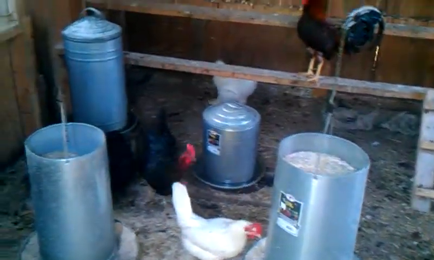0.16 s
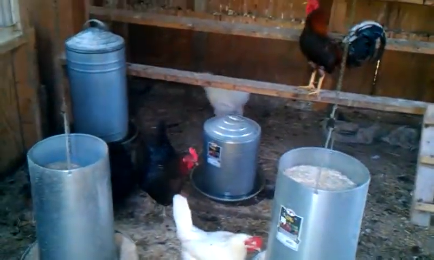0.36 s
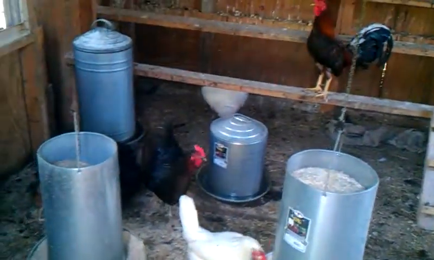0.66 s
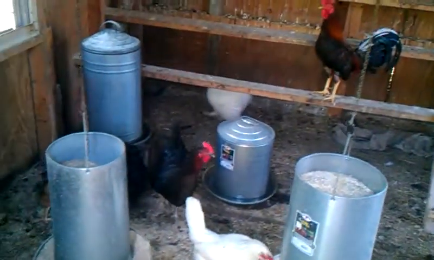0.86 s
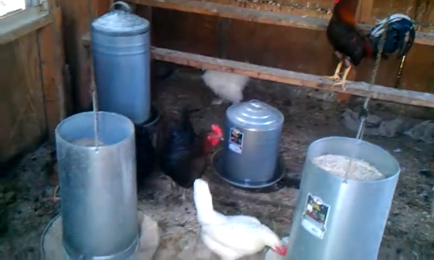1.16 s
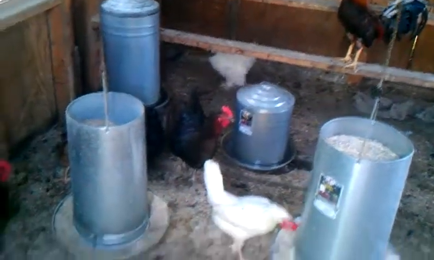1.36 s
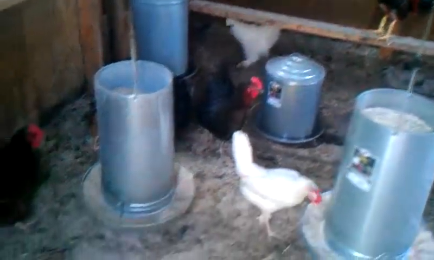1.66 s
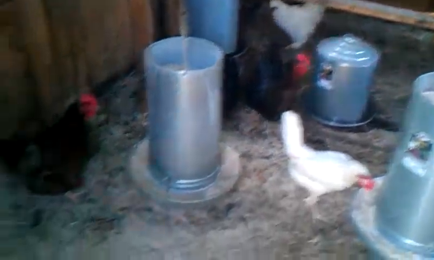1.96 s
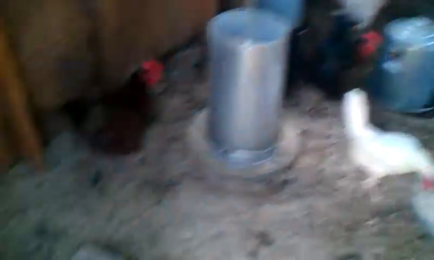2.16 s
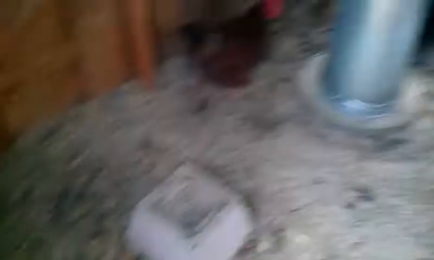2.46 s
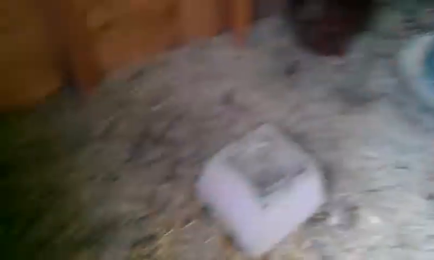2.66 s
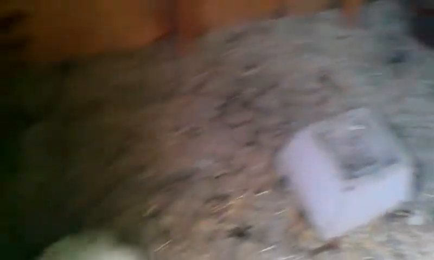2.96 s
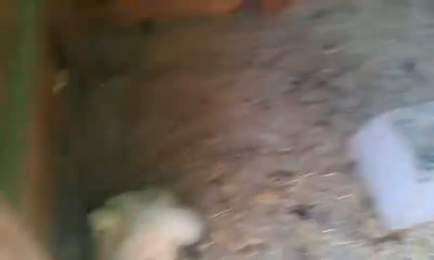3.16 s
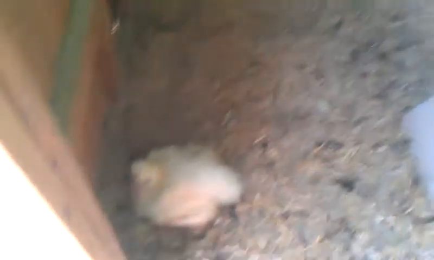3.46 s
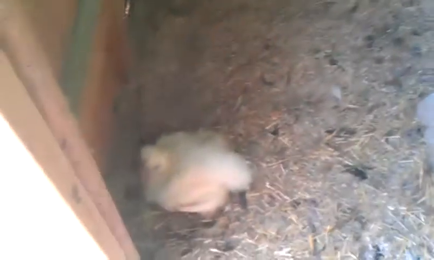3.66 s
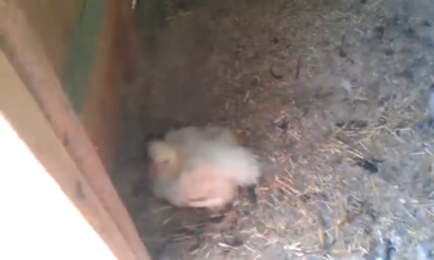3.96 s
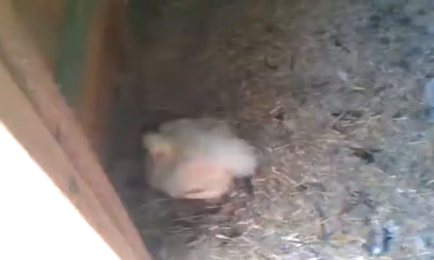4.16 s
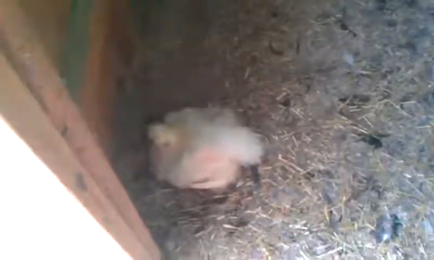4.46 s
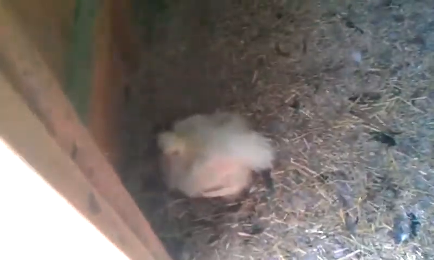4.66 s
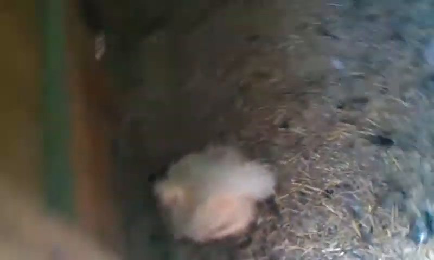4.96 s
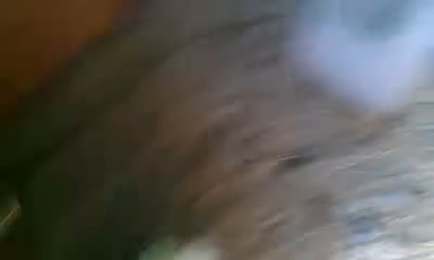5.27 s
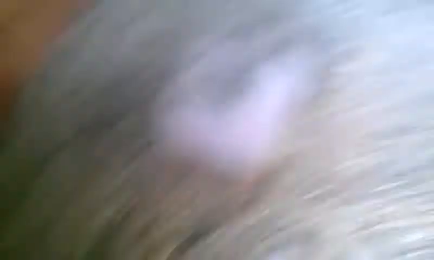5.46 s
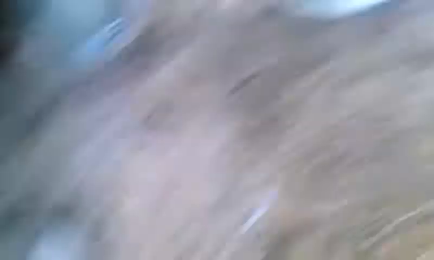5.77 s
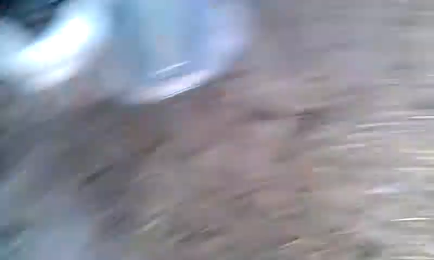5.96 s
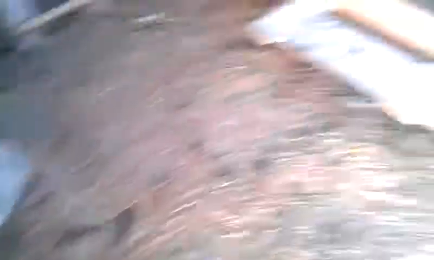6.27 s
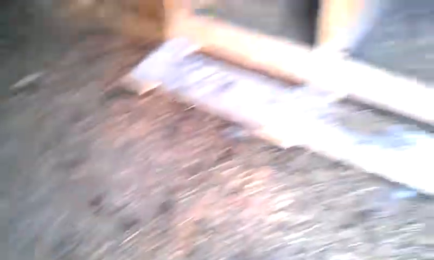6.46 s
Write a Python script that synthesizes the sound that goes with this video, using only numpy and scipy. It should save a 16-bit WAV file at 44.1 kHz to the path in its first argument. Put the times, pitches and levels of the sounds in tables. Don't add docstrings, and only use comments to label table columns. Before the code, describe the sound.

Faint far clucks give way to a steady middle-distance clucking hen, then handling bumps and a sharp close squawk, all over thin high hiss.

```python
import sys
import numpy as np
from scipy import signal
from scipy.io import wavfile
from scipy.ndimage import uniform_filter1d

SR = 44100
rng = np.random.default_rng(int(sys.argv[2]) if len(sys.argv) > 2 else 0)


def dump_mix(stems):
    frames = np.atleast_2d(stems).T
    limited = np.clip(frames, -1, 1)
    pcm = np.round(limited * 32767).astype(np.int16)
    wavfile.write(sys.argv[1], SR, pcm)


def invert_db(x):
    u = np.asarray(x, float) / 20
    return 10 ** u


N = 291501

NEAR_ROUGH = (0.51, 0.055)


def evened(x):
    return x / np.sqrt(np.mean(x ** 2) + 1e-20)


def read(points, hz):
    f, value = np.transpose(points)
    return np.interp(np.log(hz + 1), np.log(f + 1), value)


def bell(t, centre_s, half_s):
    return np.exp(-((t - centre_s) / half_s) ** 2)


def swelling(t, rest_db, swells):
    power = invert_db(rest_db) ** 2
    power = power + sum(invert_db(db) ** 2 * bell(t, s, half) for s, half, db in swells)
    return 10 * np.log10(power)


def air(layers, patchy_db):
    frames, hz = N // 128 + 6, np.fft.rfftfreq(512, 1 / SR)
    t = np.arange(frames) * 128 / SR
    power = np.zeros((len(hz), frames))
    for shape, s, level_db in layers:
        gain = invert_db(read(shape, hz)) ** 2
        power += np.outer(gain / gain.sum(), invert_db(np.interp(t, s, level_db)) ** 2)
    a, b, patches = rng.standard_normal((frames, len(hz), 3)).T
    noise = a + 1j * b
    patches = evened(uniform_filter1d(uniform_filter1d(patches, 8, 0), 24, 1))
    flicker = evened(uniform_filter1d(rng.standard_normal(frames), 10))
    unit = signal.istft(noise, nperseg=512, noverlap=384)[1].std() / np.sqrt(len(hz))
    z = noise * np.sqrt(power) * invert_db(patchy_db * patches + 0.4 * flicker)
    return signal.istft(z, nperseg=512, noverlap=384)[1][:N] / unit


def door_hiss():
    # (time [s], bright level [dB])
    facing = [(0, -54), (.3, -53), (1.29, -50.5), (1.73, -52.5), (1.88, -57.5), (3.11, -52), (3.74, -53),
              (4.2, -49.5), (4.4, -42), (4.69, -40), (5.1, -35), (5.41, -44.5), (5.62, -47.5),
              (6.15, -52.5), (6.61, -47)]
    # (frequency [Hz], density [dB per Hz])
    port = [(5000, -45), (6000, -27), (6670, -16), (6970, -8), (7280, -3), (8210, 1), (10300, -12),
            (11500, -16), (12500, -22), (15800, -27)]
    # (frequency [Hz], density [dB per Hz])
    upper = [(6000, -34), (6840, -20), (7420, -9), (8090, -5), (9300, -2), (10000, 0), (10900, -7),
             (12700, -12), (14000, -19), (15800, -19)]
    # (frequency [Hz], density [dB per Hz])
    airy = [(10000, -25), (12000, 0), (14000, -2), (15800, 0)]
    # (centre [s], half length [s], level [dB])
    swing = [
        (5.45, .16, -46),
    ]
    s = np.arange(0, N, 128) / SR
    door_db = np.interp(s, *np.transpose(facing))
    facing_db = np.minimum(door_db, -42.5)
    steady_db = -42 + 0.21 * (facing_db - door_db[0])
    airy_db = swelling(s, facing_db - 9.5, swing)
    return air([(port, s, steady_db), (upper, s, door_db), (airy, s, airy_db)], patchy_db=0.4)


def yard():
    # (centre [s], half length [s], level [dB])
    murmur_swells = [
        (.25, 0.37, -65.5),
        (1.579, 0.26, -64),
        (4.4, 0.22, -66),
        (5.2, 0.18, -61.5),
    ]
    # (centre [s], half length [s], level [dB])
    scratching = [
        (5.45, .1, -66),
        (5.85, 0.24, -65),
    ]
    # (centre [s], half length [s], change [dB])
    lull = (1.15, 0.57, -4)
    # (frequency [Hz], density [dB per Hz])
    murmur = [(150, -32), (240, -7), (300, -3.5), (550, -8), (620, -8.5), (900, -14.5), (1500, -41),
              (2500, -71)]
    # (frequency [Hz], density [dB per Hz])
    rumble = [(20, 4), (60, 6.5), (240, -1), (900, -0.5), (1540, -0.5), (2600, -5), (3500, -45),
              (5000, -51)]
    # (frequency [Hz], density [dB per Hz])
    rustle = [(2000, 1.5), (2800, 4.5), (3500, 8.5), (4250, 4.5), (5200, 11.5), (5900, 6.5), (6600, -7)]
    s = np.arange(0, N, 128) / SR
    lull_s, half_s, lull_db = lull
    murmur_db = swelling(s, -66.5, murmur_swells)
    rumble_db = -63 + lull_db * bell(s, lull_s, half_s)
    rustle_db = swelling(s, -64.5, scratching)
    return air([(murmur, s, murmur_db), (rumble, s, rumble_db), (rustle, s, rustle_db)], patchy_db=1.2)


def add(mix, s, sound):
    part = mix[round(s * SR):][:len(sound)]
    part += sound[:len(part)]


def resonate(x, hz, width):
    r = np.exp(-np.pi * width / SR)
    turn = np.exp(2j * np.pi * min(hz, SR / 2.2) / SR)
    return 2 * signal.lfilter([1 - r], [1, -r * turn], x).real


def syrinx(hz, rough, jitter):
    wobble = evened(uniform_filter1d(rng.standard_normal(len(hz)), 150))
    turns = np.cumsum(hz * (1 + jitter * wobble)) / SR
    folds = sum(np.cos(2 * np.pi * k * turns) for k in range(1, 45))
    puffs = (0.35 + np.exp(-(turns % 1) / 0.3)) * rng.standard_normal(len(hz))
    rough = np.clip(rough, 0, 1)
    return turns, (1 - rough) * evened(folds) + rough * evened(puffs)


def throat(drive, modes, mouth):
    voice = np.zeros(len(drive))
    for k, (hz, width, db) in enumerate(modes):
        once = resonate(drive, hz * mouth, width)
        voice += (-1) ** k * invert_db(db) * resonate(once, hz * mouth, width)
    return evened(voice)


def clucks(rows, modes, roughness, rise, glide, hum_s, mouth):
    out = np.zeros(N)
    t = np.arange(6000) / SR
    usual_db = np.mean([row[1] for row in rows])
    for s, db, hz, length, hum_db in rows:
        turns, drive = syrinx(hz * (1 + glide * np.clip(t / 0.054, 0, 1)), *roughness)
        burst = np.clip(t / rise, 0, 1) ** 1.5 * np.exp(-(t / length) ** 3)
        hum = bell(t, length + 0.01, hum_s) * np.clip(t / 0.029, 0, 1)
        voice = throat(drive, modes, mouth + 0.01 * (db - usual_db))
        add(out, s, invert_db(db) * burst * voice + invert_db(db + hum_db) * hum * np.sin(2 * np.pi * turns))
    return out


def coop(x, tail_db):
    # (frequency [Hz], t60 [s])
    decay = [(200, 0.32), (600, 0.31), (1300, 0.29), (4000, 0.23), (9000, 0.12)]
    # (delay [s], level [dB])
    walls = [(.004, -19), (.0075, -6.5), (.012, -8.5), (.017, -7.5), (.023, -13)]
    taps = np.zeros(SR // 2)
    at = np.arange(400, len(taps) - 20, 20)
    taps[at + rng.integers(0, 20, len(at))] = rng.choice([-1., 1.], len(at))
    hz, t, z = signal.stft(taps, SR, nperseg=256)
    tail = signal.istft(z * invert_db(-60 * t / read(decay, hz)[:, None]), SR, nperseg=256)[1]
    tail = invert_db(tail_db) * tail / np.linalg.norm(tail)
    tail[0] = 1
    for k, (s, db) in enumerate(walls):
        tail[round(s * SR)] += (-1) ** k * invert_db(db)
    return signal.fftconvolve(x, tail / np.linalg.norm(tail))[:N]


def far_hens():
    # (time [s], effort [dB], pitch [Hz], length [s], closing hum [dB])
    far_rows = [
        (.372, -46, 312.4, 0.018, -18),
        (.545, -46.5, 346.5, 0.025, -8),
        (.714, -45.5, 299.8, 0.03, -10.5),
        (1.849, -45.5, 286.5, 0.025, -8),
        (3.985, -57, 295, 0.014, -17.5),
    ]
    # (frequency [Hz], width [Hz], level [dB])
    far_modes = [(770, 290, 4), (1430, 480, -6.5), (2100, 1070, -14), (3530, 610, -19.5)]
    # (time [s], effort [dB], pitch [Hz], length [s], closing hum [dB])
    shy_rows = [
        (1.969, -48.5, 324, 0.019, -12),
        (2.081, -51.5, 322, 0.012, -11),
        (2.211, -51, 295, 0.025, -5.5),
        (2.341, -51, 298.3, 0.034, -5.5),
        (2.454, -46, 295, 0.035, -4.5),
        (5.248, -53, 315.5, 0.019, -23.5),
    ]
    # (frequency [Hz], width [Hz], level [dB])
    shy_modes = [(645, 640, 3.5), (1550, 470, 5.5), (2340, 1200, -11.5), (3620, 1300, -11.5)]
    rough = (0.4, 0.035)
    hens = clucks(far_rows, far_modes, rough, rise=0.0067, glide=0.019, hum_s=0.032, mouth=0.94)
    hens += clucks(shy_rows, shy_modes, rough, rise=0.0032, glide=0.011, hum_s=0.03, mouth=1.02)
    return coop(hens, tail_db=-1.0)


def wheezes():
    # (time [s], length [s], level [dB], start [Hz], end [Hz], width [Hz])
    calls = [
        (.77, .38, -68.5, 3500, 3250, 58),
        (0.69, 0.62, -61.5, 5700, 5500, 660),
        (0.88, 0.4, -62.5, 6900, 5300, 470),
        (1.3, 0.424, -69.5, 3500, 3540, 190),
        (5.05, 0.45, -61.5, 6000, 5200, 440),
    ]
    out = np.zeros(N)
    for s, length, db, start_hz, end_hz, width in calls:
        count = round(length * SR)
        turns = np.cumsum(np.linspace(start_hz, end_hz, count)) / SR
        breath = evened(resonate(rng.standard_normal(30000), 0, width)[:count])
        breath = breath + 40 / width
        call = evened(breath * np.cos(2 * np.pi * turns))
        add(out, s, invert_db(db) * call * signal.windows.tukey(count, 0.3))
    return out


def near_hen():
    # (time [s], effort [dB], pitch [Hz], length [s], closing hum [dB])
    near_rows = [
        (2.472, -25.5, 205.6, 0.028, -28.5),
        (2.65, -26.5, 200, 0.03, -25),
        (2.885, -30.5, 208.6, 0.031, -17),
        (3.174, -32.5, 216.1, 0.03, -13),
        (3.38, -31.5, 197.3, 0.032, -18.5),
        (3.618, -30.5, 220.6, 0.027, -14.5),
        (4.615, -33, 212.1, 0.027, -18),
        (4.938, -38.5, 209, 0.023, -18),
        (5.525, -34, 218.2, 0.033, -15.5),
    ]
    # (frequency [Hz], width [Hz], level [dB])
    near_modes = [(438, 404, -8.5), (662, 495, -5), (1227, 402, -1.7), (1752, 435, -9.5), (2390, 800, -16),
                  (3330, 830, -12), (4800, 1400, -26.5)]
    hen = clucks(near_rows, near_modes, NEAR_ROUGH, rise=0.018, glide=0.07, hum_s=0.037, mouth=1.0)
    return coop(hen, tail_db=-1.5)


def knocks():
    # (time [s], peak [dB], centre [Hz], width [Hz], t60 [s])
    bumps = [
        (4.351, -57, 73.5, 104, 0.14),
        (5.702, -52, 191, 256, 0.57),
        (5.545, -44.5, 7460, 2980, 0.92),
        (5.74, -68, 7600, 2980, 0.14),
        (5.917, -52.5, 2080, 1500, 0.15),
        (5.923, -39, 8230, 4000, 0.13),
        (6.199, -46.5, 91, 150.5, 0.41),
        (6.316, -43, 70, 120, 0.11),
    ]
    out, t = np.zeros(N), np.arange(9000) / SR
    for s, db, hz, width, t60 in bumps:
        puff = resonate(rng.standard_normal(len(t)), hz, width)
        puff = evened(resonate(puff, hz, width))
        add(out, s, invert_db(db - 60 * t / t60) * np.clip(t / 0.002, 0, 1) * puff)
    return out


def squawk():
    # (time [s], effort [dB], pitch [Hz])
    course = [
        (6.306, -32, 294.2),
        (6.322, -16.5, 298.4),
        (6.334, -19, 310.6),
        (6.361, -19, 324.2),
        (6.385, -25.5, 324),
        (6.412, -32, 314.2),
        (6.428, -46, 312.7),
        (6.44, -36, 306),
        (6.468, -48, 309),
    ]
    # (frequency [Hz], width [Hz], level [dB])
    squawk_modes = [(678, 318, -1), (888, 190, -0.5), (1210, 460, -3.5), (2090, 430, -13), (2540, 400, -7),
                    (4000, 1570, -17), (7020, 800, -16), (8480, 540, -4.5), (9950, 1050, -20.5),
                    (13200, 3900, -39)]
    s, *columns = np.transpose(course)
    t = np.arange(s[0], s[-1], 1 / SR)
    effort_db, hz = (np.interp(t, s, c) for c in columns)
    rough = np.interp(t - s[0], [0, 0.017], [0.12, 0.46])
    uneven = np.interp(t - s[0], [0, 0.058], [0.98, 0.42])
    turns, drive = syrinx(2 * hz, rough, jitter=0.02)
    drive = drive * (1 + uneven * np.cos(np.pi * turns))
    out = np.zeros(N)
    add(out, s[0], invert_db(effort_db) * throat(drive, squawk_modes, 0.97))
    return out


def close_hen():
    # (time [s], effort [dB], pitch [Hz], length [s], closing hum [dB])
    close_rows = [
        (6.145, -17.5, 233, 0.036, -40),
    ]
    # (frequency [Hz], width [Hz], level [dB])
    close_modes = [(403, 370, -11.5), (672, 256, -1), (1073, 360, 5.4), (1810, 1300, -13), (3580, 800, -10),
                   (5140, 580, -23), (6240, 650, -20), (8570, 1100, -9.5), (11900, 10000, -34)]
    # (time [s], effort [dB], pitch [Hz], length [s], closing hum [dB])
    last_rows = [
        (6.516, -18.5, 195.6, 0.025, -36),
    ]
    # (frequency [Hz], width [Hz], level [dB])
    last_modes = [(733, 360, 4), (1010, 1040, -15), (1940, 410, -7.5), (3710, 440, -17),
                  (5270, 2000, -31.5), (6580, 420, -20)]
    hen = clucks(close_rows, close_modes, (0.58, 0.06), rise=0.025, glide=0.0217, hum_s=0.074, mouth=0.97)
    hen += clucks(last_rows, last_modes, NEAR_ROUGH, rise=0.013, glide=0.037, hum_s=0.0238, mouth=1.005)
    return coop(hen + squawk(), tail_db=-1.0)


def scene():
    surroundings = door_hiss() + yard() + wheezes()
    hens = far_hens() + near_hen() + close_hen()
    return (surroundings + hens + knocks())[None]


def starve(x):
    # (frequency [Hz], step over the usual band level [dB])
    coarseness = [(900, -8), (1900, 4), (2900, 7), (3600, 6), (4300, 10), (5300, 5), (6050, 11),
                  (6800, -10), (11000, -4), (13500, 4), (15800, 3)]
    hop, width, lead = 1024, 8, 200
    n, k = np.arange(2 * hop)[:, None], np.arange(hop)
    window = np.sin(np.pi * (n + 0.5) / (2 * hop))
    basis = np.sqrt(2 / hop) * window * np.cos(np.pi / hop * (n + 0.5 + hop / 2) * (k + 0.5))
    blocks = np.pad(x, (lead + hop, 3 * hop - (N + lead) % hop)).reshape(-1, hop)
    lines = np.hstack([blocks[:-1], blocks[1:]]) @ basis
    lines = lines.reshape(len(blocks) - 1, -1, width)
    level_db = 10 * np.log10((lines ** 2).mean(2) + 1e-14)
    centre = (np.arange(hop // width) + 0.5) * width * SR / (2 * hop)
    hiss_band = (centre > 7000) & (centre < 11000)
    hiss_db = uniform_filter1d(level_db[:, hiss_band].mean(1), 5)
    wander = rng.standard_normal(level_db.shape)
    wander = evened(uniform_filter1d(uniform_filter1d(wander, 3, 0), 2, 1))
    step_db = np.median(level_db, 0) + read(coarseness, centre) + 2.3 * wander
    step_db = step_db + 0.7 * (hiss_db - np.median(hiss_db))[:, None] * (centre < 7000)
    step = invert_db(np.maximum(step_db, level_db - 8))[:, :, None]
    rounded = np.sign(lines) * np.floor(abs(lines) / step + 0.4) * step
    halves = (rounded.reshape(-1, hop) @ basis.T).reshape(-1, 2, hop)
    return (halves[1:, 0] + halves[:-1, 1]).ravel()[lead:][:N]


def top_cut(x):
    return signal.sosfilt(signal.butter(12, 15870, fs=SR, output="sos"), x)


def record(dry):
    lowpass = signal.firwin(511, 15870, window=("kaiser", 9), fs=SR)
    limited = signal.oaconvolve(dry[0], lowpass, "same")
    mix = starve(limited)[None]
    return top_cut(mix)


dry = scene()
out = record(dry)
dump_mix(out)
```